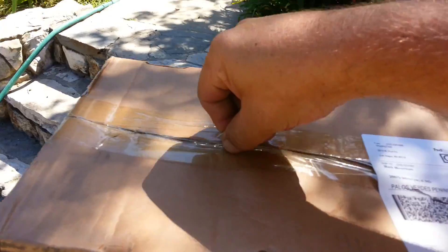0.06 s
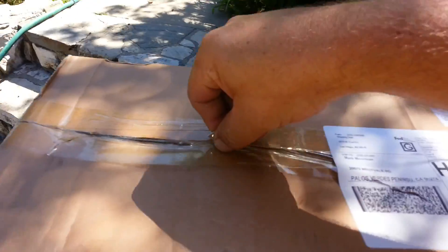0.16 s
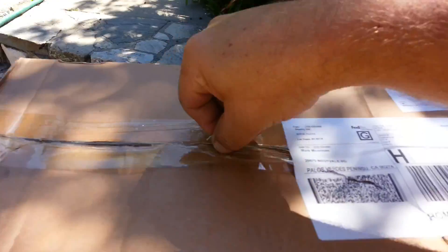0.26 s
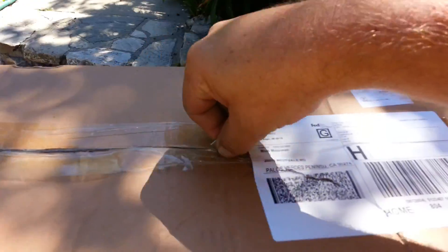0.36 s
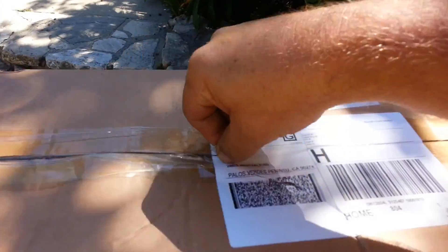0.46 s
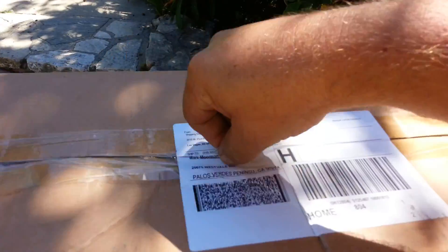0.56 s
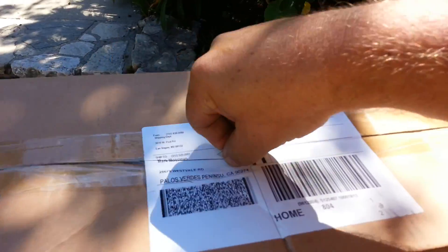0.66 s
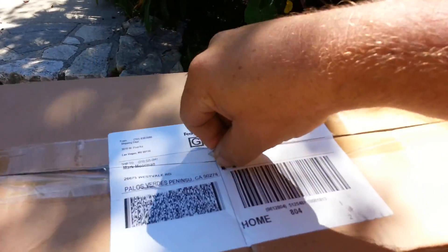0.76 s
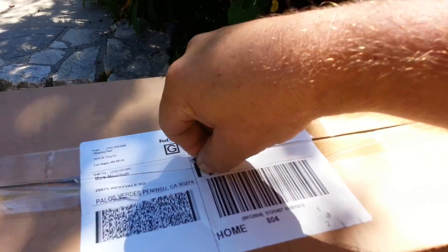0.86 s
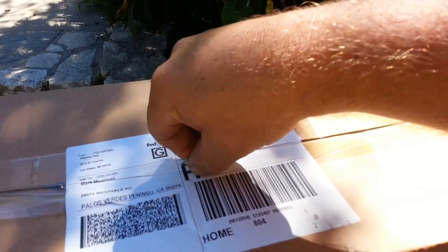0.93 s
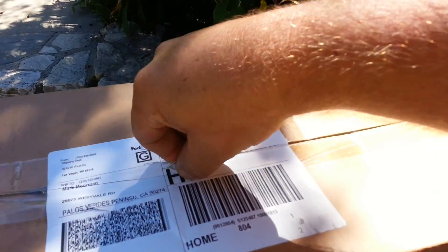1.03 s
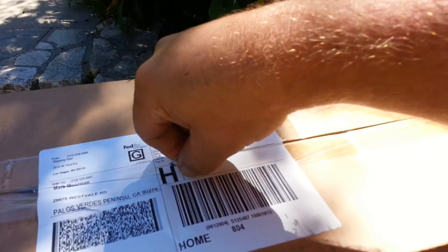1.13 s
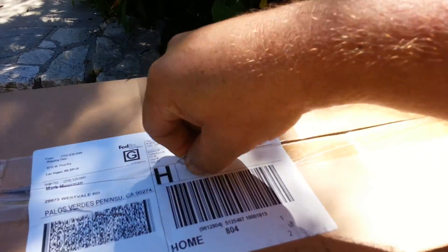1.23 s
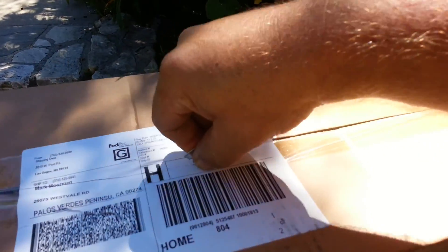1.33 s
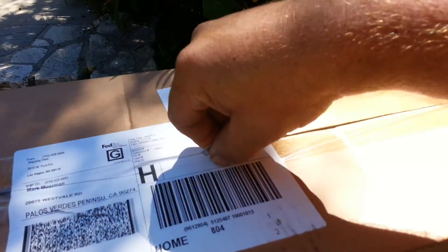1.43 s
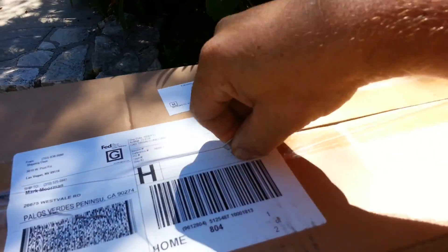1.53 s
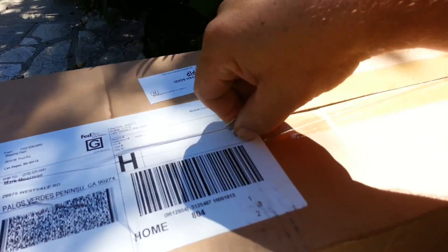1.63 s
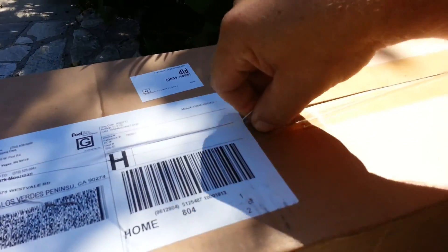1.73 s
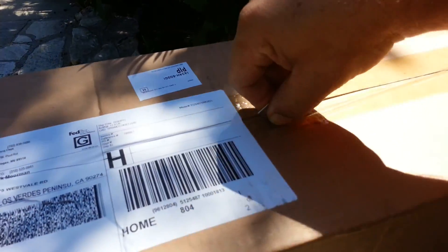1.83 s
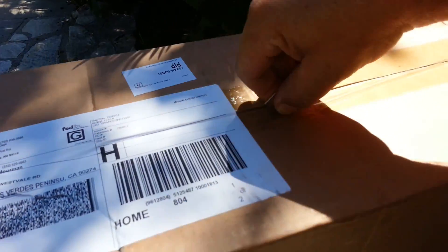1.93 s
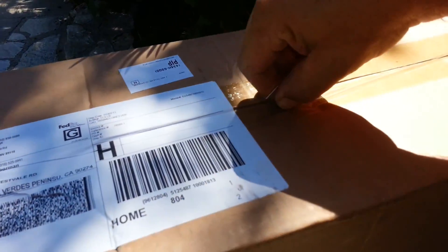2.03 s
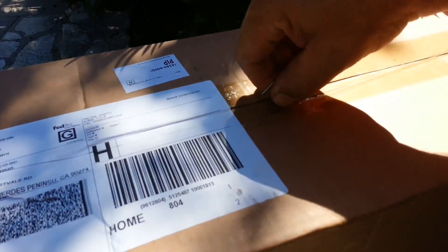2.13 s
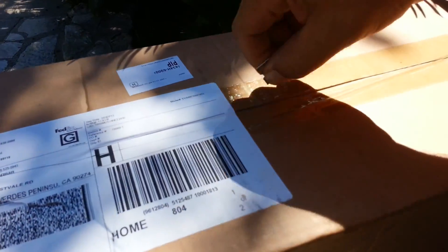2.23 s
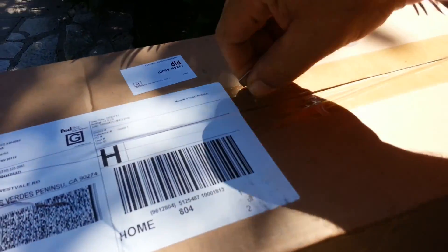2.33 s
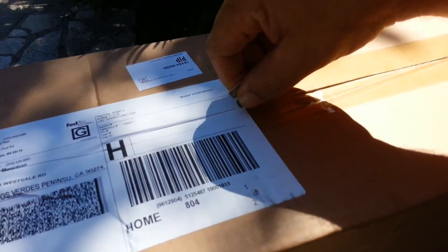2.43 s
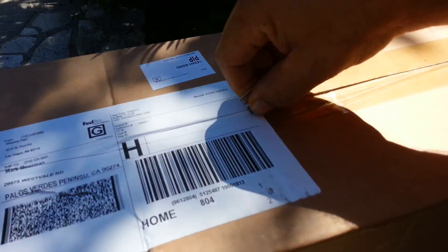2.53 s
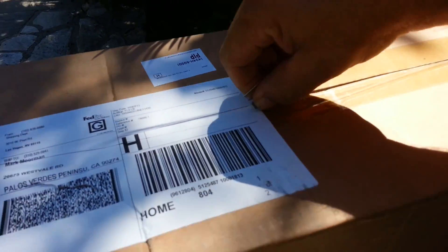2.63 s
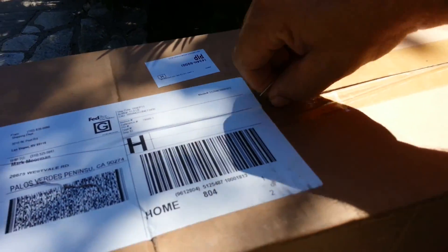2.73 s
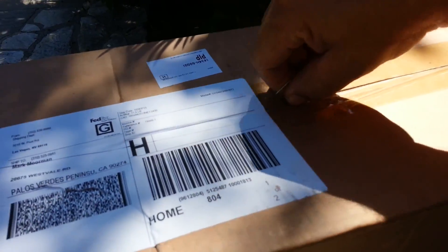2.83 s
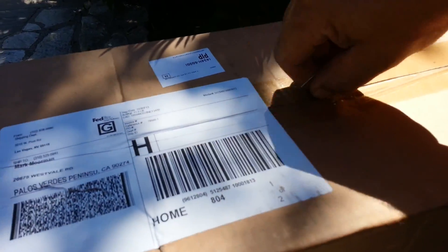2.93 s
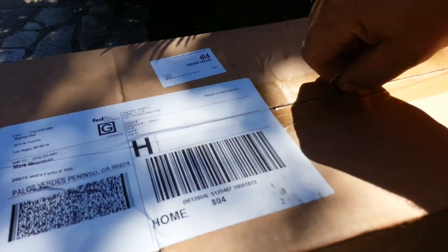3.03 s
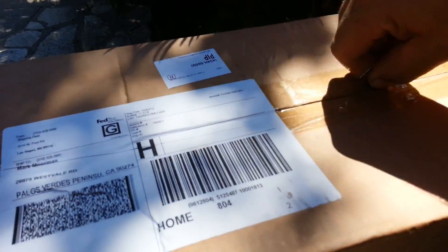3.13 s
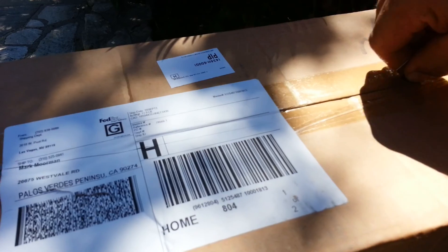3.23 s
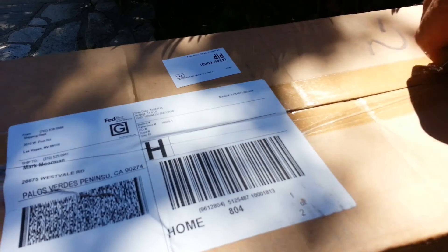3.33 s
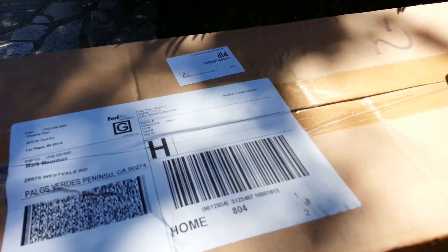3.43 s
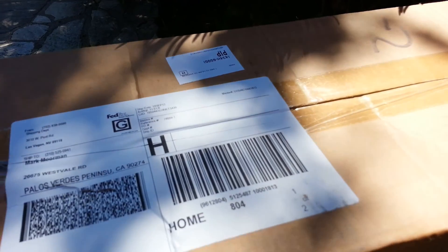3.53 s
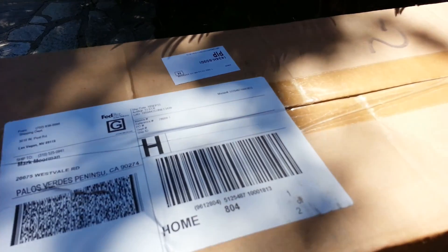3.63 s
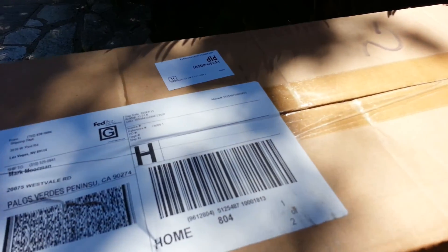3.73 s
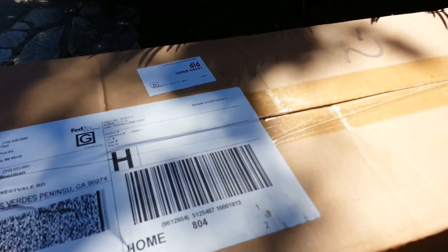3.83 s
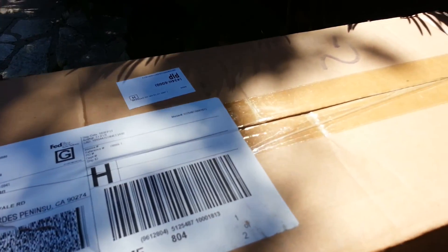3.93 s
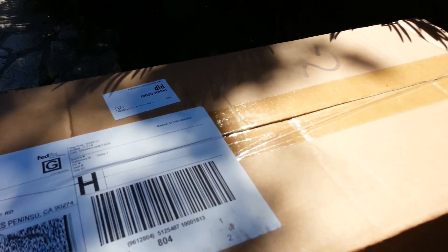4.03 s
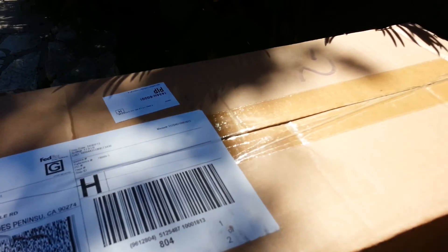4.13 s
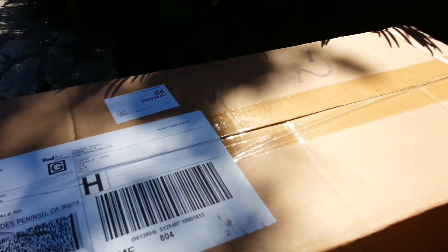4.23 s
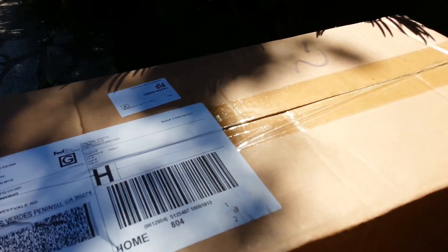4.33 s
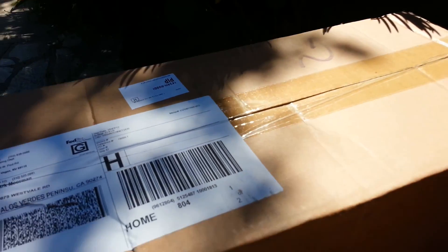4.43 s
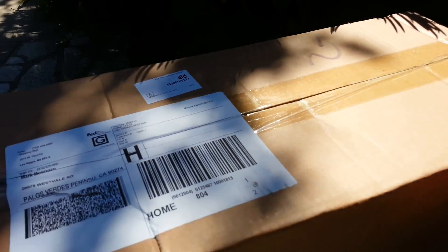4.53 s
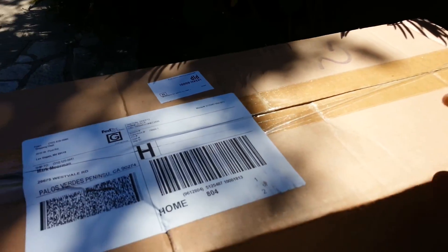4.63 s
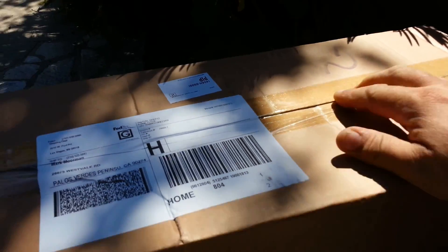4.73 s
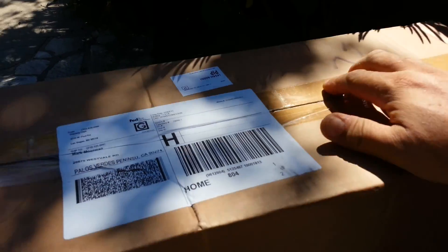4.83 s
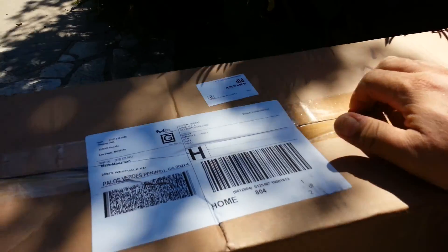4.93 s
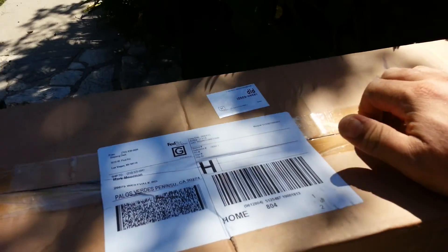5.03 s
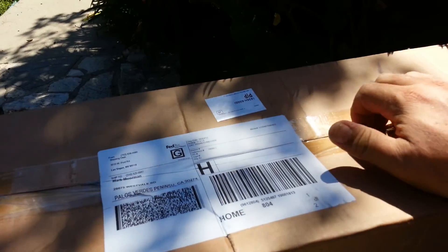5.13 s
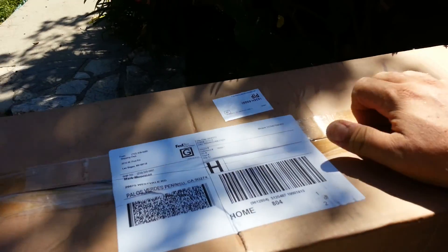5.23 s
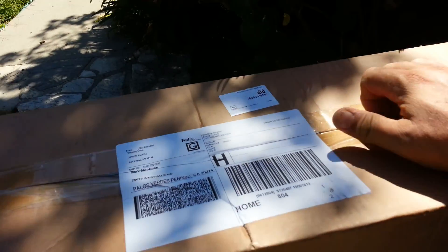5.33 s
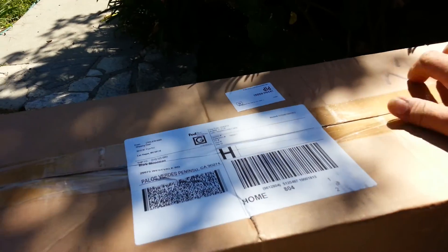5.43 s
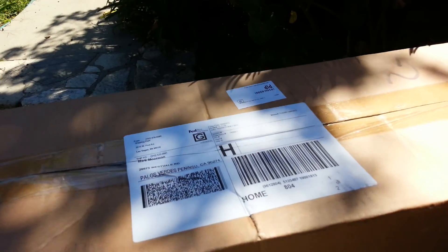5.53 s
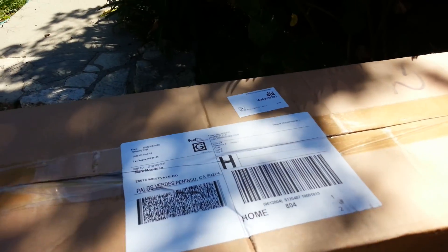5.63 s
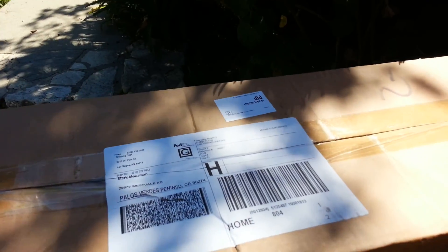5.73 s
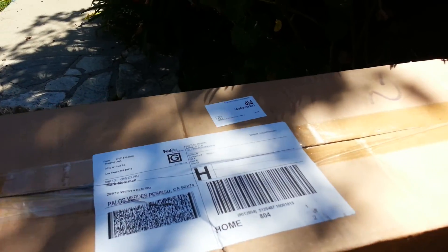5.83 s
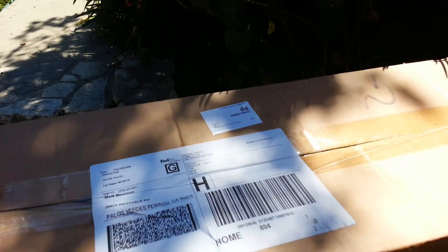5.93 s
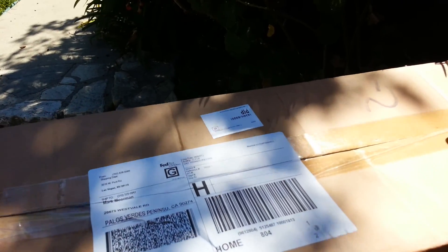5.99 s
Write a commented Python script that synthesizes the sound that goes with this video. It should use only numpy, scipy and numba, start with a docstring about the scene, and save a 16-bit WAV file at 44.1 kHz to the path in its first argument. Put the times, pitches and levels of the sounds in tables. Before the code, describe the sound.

Tape tears jerkily from a cardboard box and lets go with a thump, before a hand taps and brushes the lid over faint outdoor rumble.

```python
"""A short rasp and sharp snaps sound first, over a faint outdoor rumble: packing tape is being torn from the
seam of a cardboard box. The tape gives way by stick-slip friction, whose jerks shake the lid and the hollow
box, rips evenly through a paper label and lets go with a thump. Then a hand taps, bumps and strokes the lid
while the loose film snaps. Twice something small and hard ticks."""
import sys
import numpy as np
from scipy import signal
from scipy.fft import rfft, irfft, next_fast_len
from scipy.io import wavfile
from scipy.ndimage import uniform_filter1d, map_coordinates
from numba import njit

SR = 44100
rng = np.random.default_rng(int(sys.argv[2]) if len(sys.argv) > 2 else 0)


def inscribe(sig):
    """Save sig as 16-bit PCM at rate SR to the path in sys.argv[1].

    A 1-D sig is mono; a 2-D sig holds one channel per row.
    Samples are clipped to [-1, 1] before scaling.
    """
    pcm = np.round(np.clip(np.atleast_2d(sig).T, -1, 1) * 32767)
    wavfile.write(sys.argv[1], SR, pcm.astype(np.int16))


N = 267239

# Slips of the tape. Each row: start in seconds, film level in dB, box level in dB.
SLIPS = [(0.008, -25.5, -30), (1.133, -29.5, -38), (1.334, -21.5, -29.0), (1.42, -24.5, -28),
         (1.475, -23.5, -29.5), (1.529, -25.5, -29.5), (1.579, -22, -32), (1.621, -24.5, -29),
         (1.655, -26, -30.5), (1.696, -22.5, -27), (1.733, -23, -25.5), (1.763, -23, -27.5),
         (1.811, -22.0, -28.5), (1.833, -22, -26.5), (1.89, -18, -24.5), (1.905, -20.5, -25.5),
         (1.933, -21, -31), (1.964, -20, -23), (2.002, -21, -27), (2.05, -18.5, -26.5), (2.1, -17.5, -23),
         (2.15, -20.5, -32), (2.826, -32, -28), (2.916, -23, -26), (2.931, -21, -22), (3.108, -22.5, -26),
         (3.133, -19, -20.5), (3.15, -25, -26), (3.172, -20, -27.5), (3.195, -22, -30), (3.221, -20.5, -26),
         (3.247, -22, -27.5), (3.275, -21, -25), (3.314, -18.5, -30), (3.333, -20.5, -25.5),
         (3.361, -19.5, -27), (3.384, -22.5, -27.5), (3.413, -18.5, -27.5), (3.434, -17, -22.5),
         (3.452, -18, -27), (3.471, -19.5, -25.5), (3.488, -18, -25.5), (3.504, -21, -27),
         (3.527, -17, -22.5), (3.546, -14.5, -23.5), (3.556, -22, -22.5), (3.58, -20, -32),
         (3.597, -24.5, -27.5), (3.621, -16, -33), (3.639, -19.5, -25), (3.665, -18, -25),
         (3.699, -20.5, -22), (3.793, -21, -36), (3.846, -18, -32)]
# Steady pulls. Each row: start and end in seconds, first and last level in dB.
PULLS = [(0.037, 0.06, -39, -28), (0.099, 0.153, -28, -30), (0.21, 0.427, -31.5, -31.5),
         (0.422, 0.59, -30, -22), (0.989, 1.42, -33.5, -44.5), (1.448, 2.187, -34, -33),
         (2.188, 2.399, -58, -41.5), (2.812, 3.08, -36, -33), (3.168, 3.695, -38, -28.5),
         (3.686, 3.848, -24, -18)]
# The lowest and highest pitch of the film's tiny cracks, in Hz.
CRINKLE_RANGE = [1560, 12200]
# Snaps of the film. Each row: time in seconds, level in dB, ring frequency in Hz.
SNAPS = [(0.0408, -8.5, 1950), (0.0985, -4.5, 4800), (0.178, -5, 12700), (0.1935, -11, 13500),
         (0.332, -4.5, 5540), (0.3598, -2.5, 12900), (0.403, -3.5, 6400), (1.42, -5, 7060),
         (1.528, -5.5, 7200), (1.621, -7, 7400), (2.051, -12, 9500), (2.7742, -10.5, 5100),
         (2.9497, -7, 1950), (3.22, -8, 7400), (3.248, -4, 7140), (3.487, 2, 7200), (3.597, 2, 7400),
         (3.8942, -4.5, 3540), (3.891, 5.5, 5760), (3.976, -3, 7000), (4.002, -12, 5100),
         (4.075, -19.5, 7270), (5.862, -8.5, 12200), (5.968, -6, 7240), (6.049, -1, 6850)]
# Blows on the lid. Each row: start in seconds, level in dB, boom relative to that level in dB.
KNOCKS = [(0.044, -12, -44), (0.098, -7, -44), (0.383, -11.5, -46), (2.731, -9.5, -37), (2.935, -8, -40),
          (2.953, -7, -13.5), (3.715, -7.5, -12.5), (3.865, -13.5, -2.5), (3.893, -7, -33),
          (3.903, -5, -15), (3.92, -12, -2), (4.006, -20.5, -39), (4.945, -11, -11), (4.953, -14, -4),
          (4.964, -10, 0), (5.295, -18, -35), (5.364, -21, -33), (5.575, -12, -32), (6.002, -14.5, -42)]
# The air in the box booms lower once the lid is free. Each row: time in seconds, frequency in Hz.
CAVITY_PITCH = [(3.9, 93), (4.9, 71)]
# Fixed modes of the box. Each row: frequency in Hz, bandwidth in Hz, gain in dB.
BOX_MODES = [(103, 26, -1.5), (240, 80, -1), (510, 45, 2.5)]
# The lid rings differently along the seam. Each row: time in seconds, panel frequency in Hz,
# frequency of the flutes (the card's corrugations) in Hz, relative flute gain in dB.
LID_TUNING = [(0.1, 375, 1930, 1), (1.4, 334, 1720, -6), (2.72, 299, 1900, -3), (2.93, 320, 1950, 2),
              (3.5, 322, 2000, -1.5), (3.8, 310, 2060, -14), (5.55, 319, 2130, 7.5), (5.7, 246, 2220, 4)]
# The rip through the label. Each row: time in seconds, relative level in dB.
LABEL_LEVEL = [(0.5, -54), (0.548, -26), (0.63, -27.5), (0.684, -21.5), (0.95, -22), (0.974, -27),
               (0.985, -43), (1.0, -38)]
# Hard ticks. Each row: start in seconds, peak in dB, delay of the faint ring in seconds.
TICKS = [(2.397, -16.5, .058), (4.385, -22.5, 0.1)]
# Modes of a tick. Each row: frequency in Hz, relative level in dB, 60 dB decay time in seconds.
TICK_MODES = [(900, 22, 0.0042), (3350, 19, 0.014)]
# Hand strokes. Each row: fastest moment and half length in seconds, level in dB, hiss pitch in Hz.
STROKES = [(4.353, 0.083, -53, 6900), (4.769, 0.094, -38.5, 8900), (5.006, 0.059, -30.5, 7200),
           (5.177, 0.099, -30.5, 7300), (5.462, 0.11, -33, 7300), (5.695, 0.094, -24, 6700),
           (6.006, 0.22, -35.5, 6700)]
# Fingertip and nail taps. Each row: start in seconds, click and card peaks in dB, click pitch in Hz.
TAPS = [(4.604, -13, -8.5, 9400), (4.630, -7, -13.5, 7700), (4.668, -7.5, -18, 9700),
        (4.7323, -4, -19, 8800), (4.736, -0.5, -23, 13000), (4.764, -16, -27, 9000),
        (4.802, -17.5, -21, 11000), (4.945, -9, -20, 7500), (6.005, -10, -8, 7240)]
# Spectra of the sources. Each row: frequency in Hz, relative spectral density in dB.
AIR_SPECTRUM = [(25, -18), (213, -10.5), (340, -20), (500, -15.5), (700, -26.5), (15000, -53.5)]
FILM_SPECTRUM = [(500, -16), (1000, -14.5), (1400, 0.5), (2000, 2), (3000, -2), (3700, 2), (4600, 0),
                 (5600, 4.5), (7150, 8), (8200, 0.5), (9800, -3.5), (13800, -1.5)]
PAPER_SPECTRUM = [(590, -16.5), (1000, -5.5), (1450, -8.5), (1720, -1), (2040, 2.5), (2400, -11.5),
                  (3750, -7), (4400, -10.5), (6400, -2), (9430, -14)]
BOX_UNDER_PAPER_SPECTRUM = [(55, -15.5), (120, -4.5), (330, 5.5), (520, 6.5), (850, -2), (1100, -30)]
SKIN_SPECTRUM = [(400, -7.5), (1100, -1.5), (3900, -1), (5000, -1.5), (7000, 0), (14500, -6.5)]
# Coherence of a rasp. Each row: frequency in Hz, share of power common to left and right.
COHERENCE = [(1000, 0.56), (2200, 0.089), (9000, 0.021)]
# Brightness of the top treble. Each row: time in seconds, gain in dB for a share of that band.
SHEEN = [(2.1, 5.5), (3.2, 6), (3.8, 1.5), (4.4, -26), (4.6, -10), (5.7, -0.5)]
# Stereo balance. Each row: frequency in Hz, left minus right in dB.
BALANCE = [(80, -4), (300, -1), (650, 5.5), (1200, -8), (4500, -3), (8000, -9), (13000, -14.5)]
# Reverberation of the yard. Each row: frequency in Hz, 60 dB decay time in seconds.
YARD_DECAY = [(200, 0.07), (4000, 0.11), (12000, 0.06)]


def amp(db):
    """Amplitude grows tenfold for every 20 dB."""
    return 10 ** (np.asarray(db) / 20)


def unit(x):
    """Normalisation to an rms of 1."""
    return x / np.sqrt(np.mean(x ** 2) + 1e-20)


def at_peak(x, db):
    """Normalisation to a peak level in dB."""
    return amp(db) * x / np.abs(x).max()


def along(points, hz):
    """Interpolation of (Hz, value) points on a logarithmic frequency axis."""
    f, v = np.transpose(points)
    return np.interp(np.log(hz + 1), np.log(f + 1), v)


def wobble(rate):
    """Smooth random modulation, with rate knots a second."""
    return map_coordinates(rng.standard_normal(int(N * rate / SR) + 4), [np.arange(N) * rate / SR])


def add(track, s, sound):
    """Superposition of a sound on a track, from s seconds on."""
    part = track[..., max(0, round(s * SR)):][..., :sound.shape[-1]]
    part += sound[..., :part.shape[-1]]


def filtered(x, response):
    """Linear filtering multiplies the spectrum by a frequency response."""
    n = x.shape[-1]
    size = 2 * next_fast_len(n // 2 + SR // 8)
    return irfft(rfft(x, size) * response(np.fft.rfftfreq(size, 1 / SR)), size)[..., :n]


def colour(x, spectrum):
    """A minimum-phase filter imposes a spectrum causally."""
    def response(hz):
        cepstrum = irfft(np.log(amp(along(spectrum, hz))))
        cepstrum[1:len(cepstrum) // 2] *= 2
        cepstrum[len(cepstrum) // 2 + 1:] = 0
        return np.exp(rfft(cepstrum))
    return filtered(x, response)


def ring(x, modes):
    """Modal superposition: resonances (Hz, bandwidth in Hz, dB) respond in parallel."""
    return filtered(x, lambda f: sum(amp(db) * 1j * f * width / (hz * hz - f * f + 1j * f * width)
                                     for hz, width, db in modes))


@njit
def resonator(x, hz, width_hz):
    """A driven, damped oscillator whose tuning may move each sample; rows are channels."""
    out = np.zeros_like(x)
    for c in range(x.shape[0]):
        speed = place = 0.0
        for i in range(x.shape[1]):
            step = 2 * np.sin(np.pi * hz[i] / SR)
            speed += 2 * np.pi * width_hz / SR * (x[c, i] + 1e-20 - speed) - step * place
            place += step * speed
            out[c, i] = speed
    return out


def driven(force, level, body):
    """Forced vibration of a body, scaled so that its rms follows a level curve."""
    return body(force * level) / np.std(body(force[..., :SR]))


def grit(rate, rough_db):
    """Common amplitude modulation gives three noises (left, right, box) the same grain."""
    return unit(rng.standard_normal((3, N)) * amp(rough_db * wobble(rate)))


def air(level_db=-43, apart=0.55):
    """Distant outdoor rumble is low, partly coherent noise of nearly steady level."""
    noise = rng.standard_normal((3, N))
    return amp(level_db + wobble(1.177)) * unit(colour(noise[2] + apart * noise[:2], AIR_SPECTRUM))


def slips(slip_s=0.018, attack_s=0.0011, release_share=0.24, sag_db=4, jolt_db=19, jolt_s=0.00068):
    """Stick-slip friction: the tape runs in ragged spurts, eases as it slackens and catches again."""
    film_level, box_level, jolts = np.zeros((3, N))
    t = np.arange(SR // 10) / SR
    gaps = np.diff([row[0] for row in SLIPS], append=N / SR)
    for (s, film_db, box_db), gap in zip(SLIPS, gaps):
        length = min(slip_s, 0.65 * gap) * np.exp(0.33 * rng.uniform(-1.09, 1))
        attack = 1 - np.exp(-t / attack_s)
        release = np.exp(-np.maximum(t - length, 0) / (release_share * length))
        shape = attack * amp(sag_db * (0.5 - t / length)) * release
        add(film_level, s, amp(film_db) * shape)
        add(box_level, s, amp(box_db) * shape)
        add(jolts, s, amp(box_db + jolt_db) * np.exp(-t / jolt_s))  # the lid springs back
    spurts = unit(amp(wobble(330)))
    force = grit(1500, rough_db=0.5) * spurts + crinkle()
    return rasp(force, film_level, box_level, film) + lid(jolts)


def crinkle(per_s=200, base_db=6, spread_db=2):
    """Crackling noise: tiny cracks at random times and pitches, mostly small and a few large."""
    out = np.zeros((3, N))
    low_hz, high_hz = CRINKLE_RANGE
    for when, pitch, size, *reach in rng.random((int(per_s * N / SR), 6)):
        hz = low_hz + pitch * (high_hz - low_hz)
        gain = amp(base_db + spread_db * min(-np.log(1 - size), 3)) * np.sqrt(hz / high_hz)
        add(out, when * N / SR, gain * np.outer(0.5 + np.array(reach), ping(hz, cycles=2)))
    return out


def ping(hz, cycles):
    """Damped free vibration of a crease, falling to 1/e in the given cycles."""
    t = np.arange(SR // 40) / SR
    return np.sin(2 * np.pi * hz * t) * np.exp(-hz * t / cycles)


def rasp(force, surface_level, box_level, surface, apart=0.27):
    """Friction radiates from the surface, less coherently in the treble, and drives the lid."""
    separate = filtered(force[:2], lambda hz: np.sqrt(1 - along(COHERENCE, hz)))
    common = filtered(force[2], lambda hz: np.sqrt(along(COHERENCE, hz)))
    hum = driven(force[2] + apart * force[:2], box_level, lid)
    return surface_level * unit(surface(separate + common)) + hum


def film(x, drift=0.025, flute_db=4.5):
    """Resonances of the stretched tape drift with the grip and couple to the flutes beneath."""
    clock = np.arange(N) + np.cumsum(drift * wobble(13))
    steady = lid_reflection(colour(x, FILM_SPECTRUM))
    tape = np.array([map_coordinates(row, [clock], order=5, mode="wrap") for row in steady])
    _, flutes = lid_resonances(tape, 0)
    return tape + amp(flute_db) * flutes


def lid_reflection(x, share=0.41, delay_s=0.000605, sway=0.29):
    """Comb filtering: a reflection off the lid carves notches that shift as the hand moves."""
    clock = np.arange(N) - delay_s * SR * np.exp(sway * wobble(9))
    return x + share * np.array([map_coordinates(row, [clock], mode="wrap") for row in x])


def lid_resonances(x, s, panel_width_hz=80.0, flute_width_hz=110.0):
    """Panel and flutes resonate to a force starting at s seconds, tuned by the place on the seam."""
    when, *columns = np.transpose(LID_TUNING)
    t = s + np.arange(x.shape[-1]) / SR
    panel_hz, flute_hz, flute_db = (np.interp(t, when, column) for column in columns)
    rows = np.ascontiguousarray(np.atleast_2d(x))
    panel = resonator(rows, panel_hz, panel_width_hz)
    flutes = amp(flute_db) * resonator(rows, flute_hz, flute_width_hz)
    return panel.reshape(x.shape), flutes.reshape(x.shape)


def lid(x, s=0, flute_db=-13, panel_db=6.5):
    """The lid is a soundboard: its hollow note and flutes add to the fixed modes of the box."""
    panel, flutes = lid_resonances(x, s)
    return ring(x, BOX_MODES) + amp(panel_db) * panel + amp(flute_db) * flutes


def pulls(attack_s=0.0018, release_s=0.03, usual_db=-33, box_db=-3, box_exponent=0.81, catch_db=1.2):
    """Creep under tension: the film crackles louder as the pull grows; the lid follows less steeply."""
    t, level = np.arange(N) / SR, np.zeros(N)
    for start, end, first_db, last_db in PULLS:
        grip = np.clip((t - start) / attack_s, 0, 1) * np.exp(-np.maximum(t - end, 0) / release_s)
        level += grip * amp(np.interp(t, [start, end], [first_db, last_db]))
    box_level = amp(usual_db + box_db) * (level / amp(usual_db)) ** box_exponent
    catch = unit(amp(catch_db * wobble(70)))  # the glue holds unevenly
    return rasp(grit(2500, rough_db=5) * catch + crinkle(), level, box_level, film)


def snaps(crack_t60=0.0046, shiver_t60=0.02, shiver_db=-24, crack_db=-5, box_db=-16):
    """Buckling: a crease flips with a ringing crack, a shiver of film and a tap on the lid."""
    out, t = np.zeros((2, N)), np.arange(SR // 8) / SR
    envelope = amp(-60 * t / crack_t60) + amp(shiver_db - 60 * t / shiver_t60)
    for s, db, hz in SNAPS:
        burst = rng.standard_normal((3, len(t))) * envelope
        sound = at_peak(colour(burst[:2], FILM_SPECTRUM), crack_db) + at_peak(lid(burst[2], s), box_db)
        add(sound, 0, ping(hz, cycles=3.4))
        add(out, s + 0.001015, amp(db) * sound)
    return out


def knocks(contact_s=0.00045, rattle=0.27, rattle_t60=0.12, boom_t60=0.14, scuff_db=-35):
    """Impact excitation: a soft blow rings the lid and the cavity resonance of the box."""
    out, t = np.zeros((2, N)), np.arange(SR // 3) / SR
    for s, db, boom_db in KNOCKS:
        scrape = rng.standard_normal((3, len(t))) * amp(-60 * t / rattle_t60)
        card = lid(np.exp(-t / contact_s) + rattle * scrape[2], s, flute_db=-2)
        boom_hz = np.interp(s, *np.transpose(CAVITY_PITCH))
        boom = np.sin(2 * np.pi * boom_hz * t) * amp(boom_db - 60 * t / boom_t60)
        scuff = amp(scuff_db) * colour(scrape[:2], FILM_SPECTRUM)
        add(out, s, amp(db) * (at_peak(card, 0) - boom + scuff))
    return out


def label_rip(paper_db=3.5, box_db=3):
    """Fracture of paper fibres, in a dense and even stream, hisses and shakes the box."""
    level = amp(np.interp(np.arange(N) / SR, *np.transpose(LABEL_LEVEL), left=-120, right=-120))
    force = grit(1500, rough_db=3.5)
    fibres = driven(force[:2], level * amp(paper_db), lambda x: colour(x, PAPER_SPECTRUM))
    box = driven(force[2], level * amp(box_db), lambda x: colour(x, BOX_UNDER_PAPER_SPECTRUM))
    return lid_reflection(fibres) + box


def ticks(noise_t60=0.0079, haze_db=-21, haze_t60=0.4, haze_hz=3450, haze_width_hz=480):
    """Quickly damped modes of a small hard object make a click; a faint, hazy ring follows."""
    out, t = np.zeros((2, N)), np.arange(SR // 2) / SR
    band = [(haze_hz, haze_width_hz, 0)]
    for s, db, delay_s in TICKS:
        click = sum(amp(level - 60 * t / t60) * np.sin(2 * np.pi * hz * t)
                    for hz, level, t60 in TICK_MODES)
        click += 0.5 * amp(-60 * t / noise_t60) * rng.standard_normal(len(t))
        haze = ring(ring(rng.standard_normal((2, len(t))), band), band) * amp(-60 * t / haze_t60)
        add(out, s, at_peak(click, db))
        add(out, s + delay_s, at_peak(haze, db + haze_db))
    return out


def strokes(box_db=-8.5, steepness=2.6, peak_width_hz=1300.0, peak_db=2):
    """Sliding friction: skin hisses on the lid, swelling with speed, each stroke at its own pitch."""
    t = np.arange(N) / SR
    powers = np.array([amp(db) ** 2 * np.exp(-2 * np.abs((t - s) / half) ** steepness)
                       for s, half, db, _ in STROKES])
    level = np.sqrt(powers.sum(0))
    strongest_hz = np.array([row[3] for row in STROKES], float)[powers.argmax(0)]
    pitch = uniform_filter1d(strongest_hz, SR // 20)

    def skin(x):
        hiss = np.ascontiguousarray(colour(x, SKIN_SPECTRUM))
        return hiss + amp(peak_db) * resonator(hiss, pitch, peak_width_hz)
    return rasp(grit(3000, rough_db=2.5), level, level * amp(box_db), skin)


def taps(nail_t60=0.013, click_width_hz=2600, bright_db=-7, card_t60=0.053):
    """Brief contact excites high frequencies: a nail clicks on the film and the card clacks dryly."""
    out, t = np.zeros((2, N)), np.arange(SR // 8) / SR
    for s, click_db, card_db, hz in TAPS:
        noise = rng.standard_normal((3, len(t)))
        click = ring(noise[:2] * amp(-60 * t / nail_t60),
                     [(hz, click_width_hz, 0), (11000, 8700, bright_db)])
        card = colour(noise[2] * amp(-60 * t / card_t60),
                      [(100, -3), (480, -1), (1400, -4), (3200, -7.5), (12000, -20)])
        add(out, s, at_peak(click, click_db) + at_peak(card, card_db))
    return out


def direction(hz, right_lead_s=0.000094, lead_above_hz=167):
    """Level and time differences place the tape to the right: its treble is louder and earlier there."""
    tilt = amp(along(BALANCE, hz))
    lag = np.exp(-2j * np.pi * np.maximum(hz - lead_above_hz, 0) * right_lead_s)
    return np.array([tilt * lag, np.ones_like(tilt)]) * np.sqrt(2 / (1 + tilt ** 2))


def yard(x):
    """Reverberation: paving and walls return a short, diffuse tail."""
    hz, t, noise = signal.stft(rng.standard_normal((2, SR // 2)), SR, nperseg=256)
    decay = amp(-60 * t / along(YARD_DECAY, hz)[:, None])
    _, tail = signal.istft(noise * decay, SR, nperseg=256)
    return signal.fftconvolve(x, tail / np.linalg.norm(tail[0]), axes=1)[:, :N]


def scene(yard_db=-14):
    """Direct sound from the box superposes with its reverberation, the ticks and the rumble."""
    near = slips() + pulls() + label_rip() + strokes() + snaps() + knocks() + taps()
    sheen = amp(np.interp(np.arange(N) / SR, *np.transpose(SHEEN)))
    treble = filtered(near, lambda hz: along([(8000, 0), (11000, 0.55)], hz))
    near += (sheen - 1) * treble
    return filtered(near, direction) + amp(yard_db) * yard(near) + ticks() + air()


def record(dry, low_hz=58, top_hz=14650, ceiling=0.8):
    """Band limiting and clipping: the deepest bass, the tallest peaks and the highest treble are cut."""
    thin = signal.sosfilt(signal.butter(2, low_hz, "high", fs=SR, output="sos"), dry)
    return filtered(np.clip(thin, -ceiling, ceiling), lambda hz: 1 / np.sqrt(1 + (hz / top_hz) ** 140))


dry = scene()
out = record(dry)
inscribe(out)
```